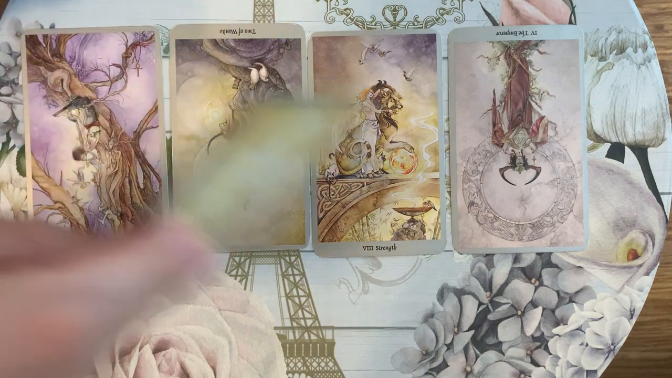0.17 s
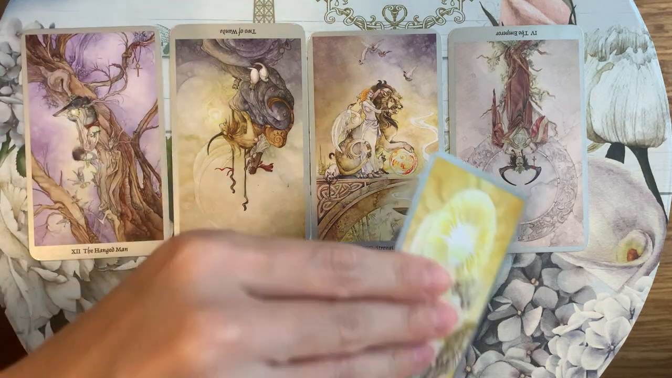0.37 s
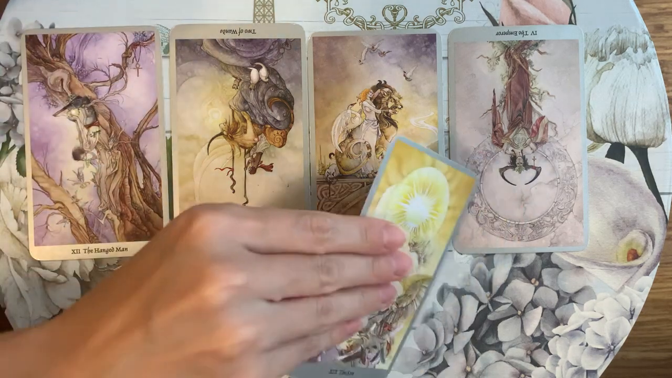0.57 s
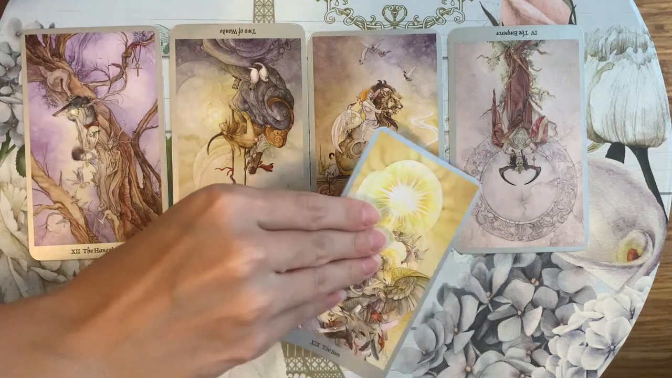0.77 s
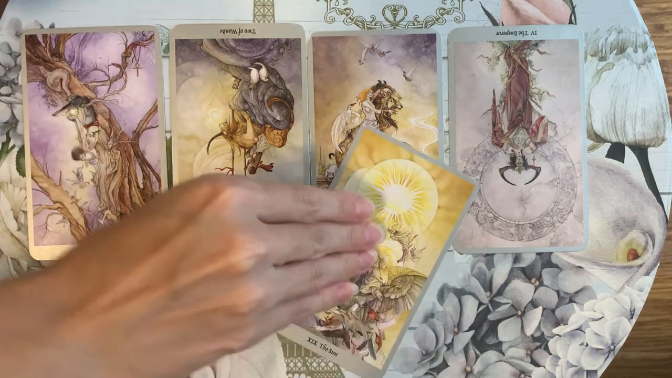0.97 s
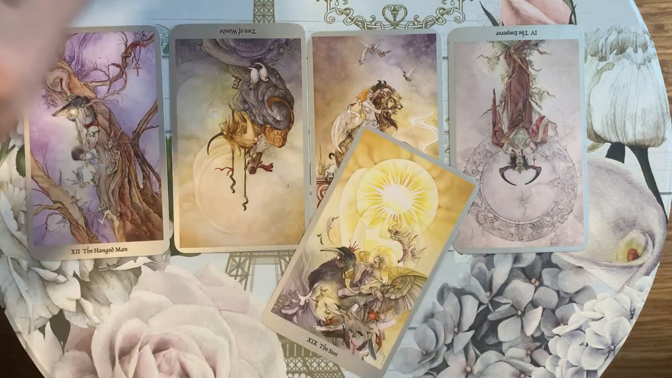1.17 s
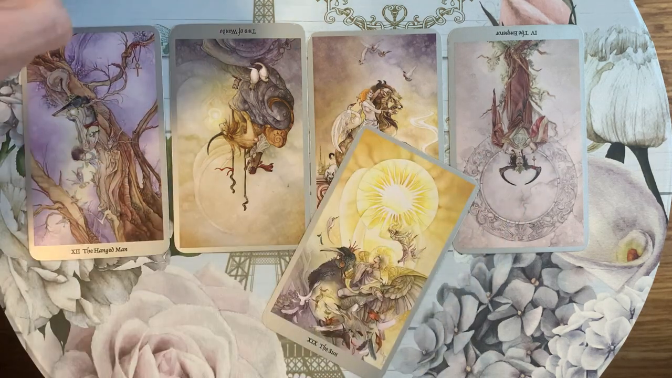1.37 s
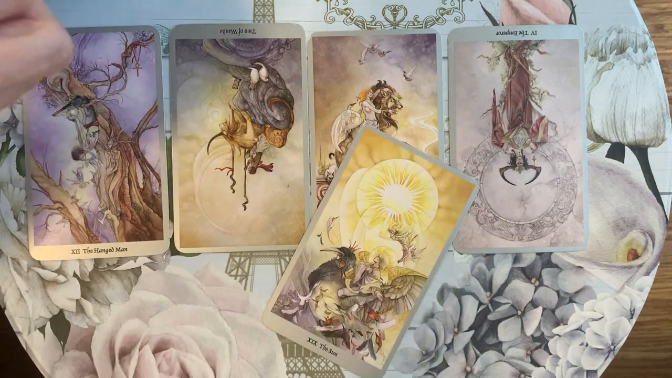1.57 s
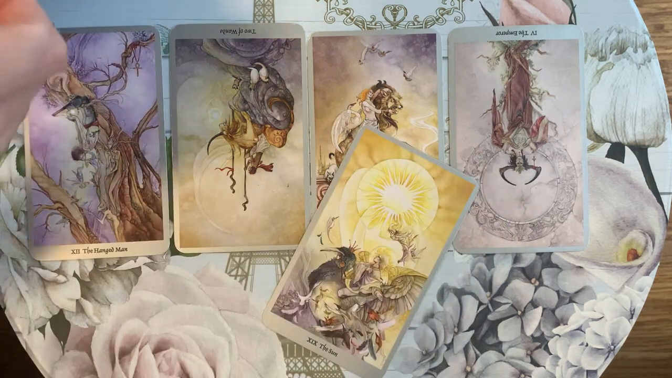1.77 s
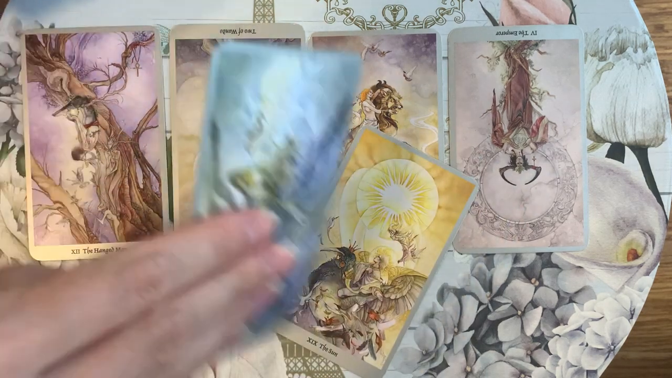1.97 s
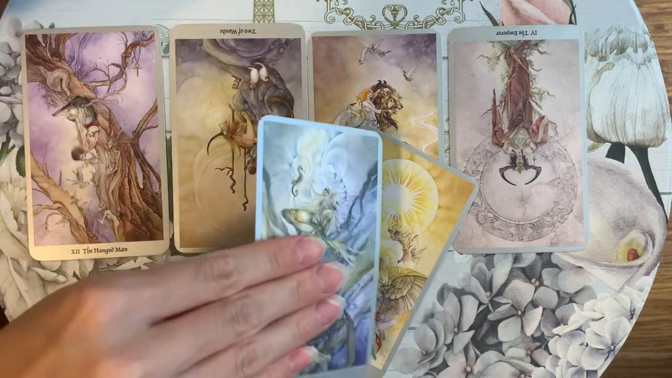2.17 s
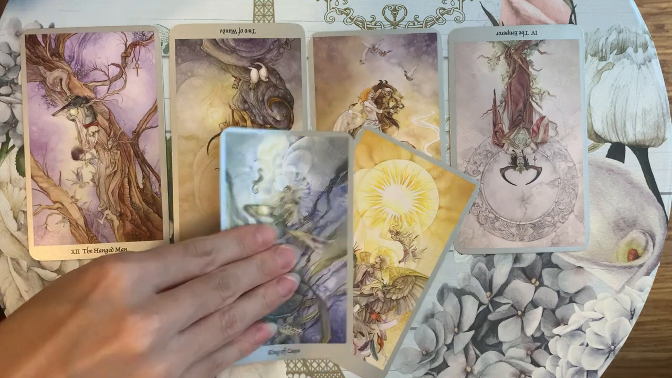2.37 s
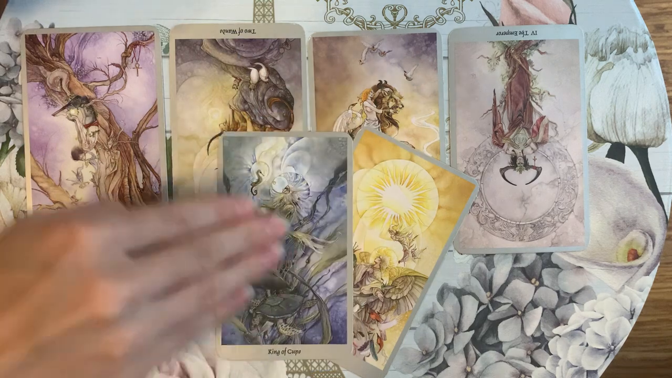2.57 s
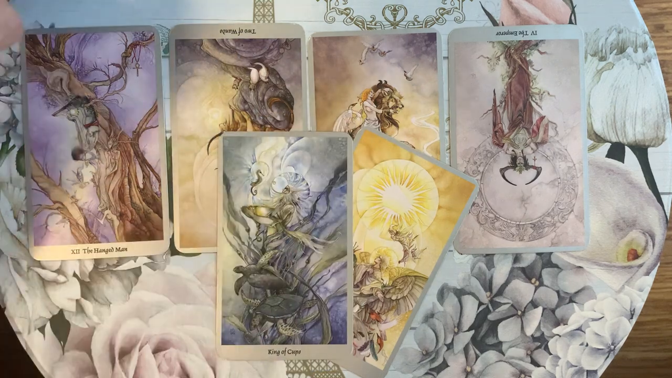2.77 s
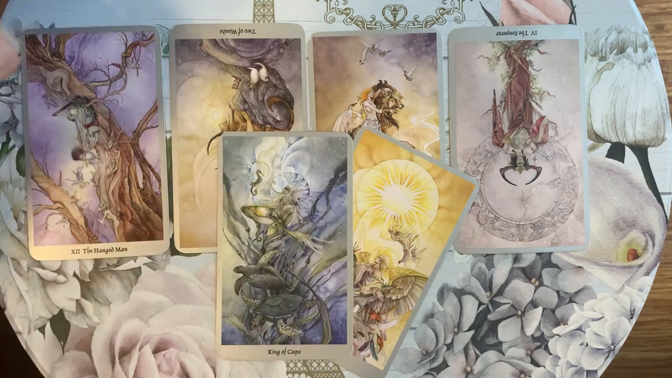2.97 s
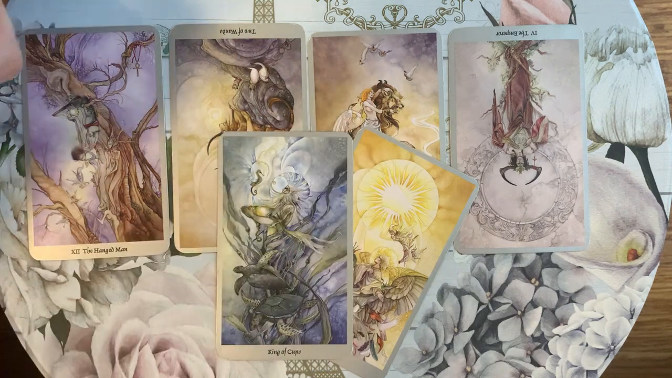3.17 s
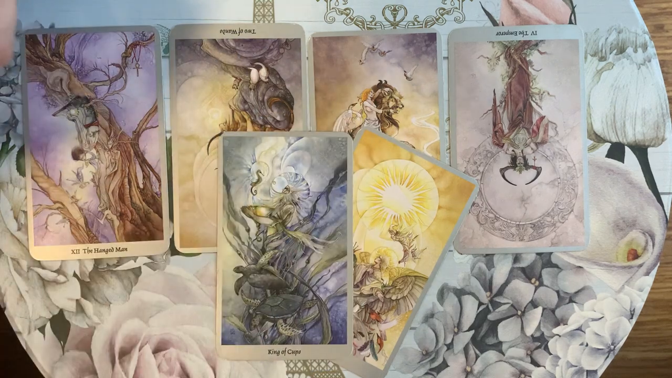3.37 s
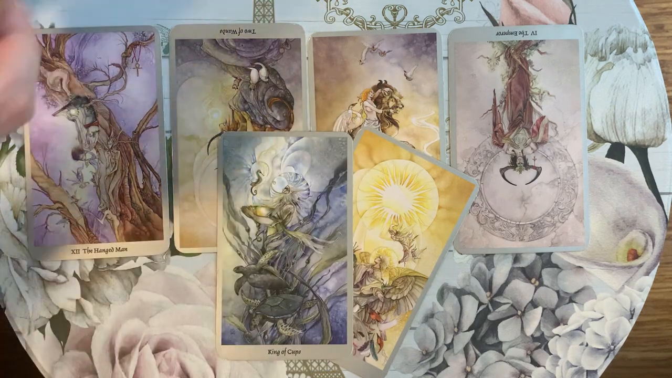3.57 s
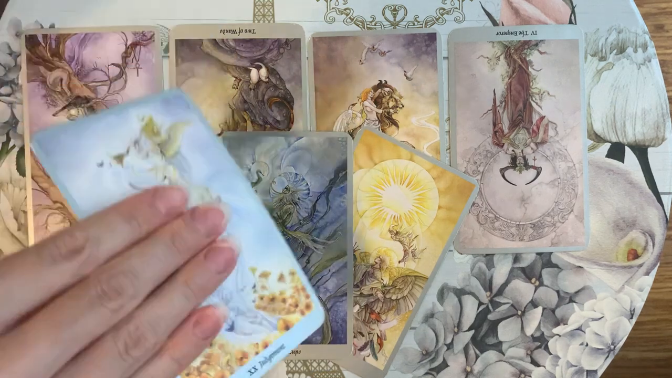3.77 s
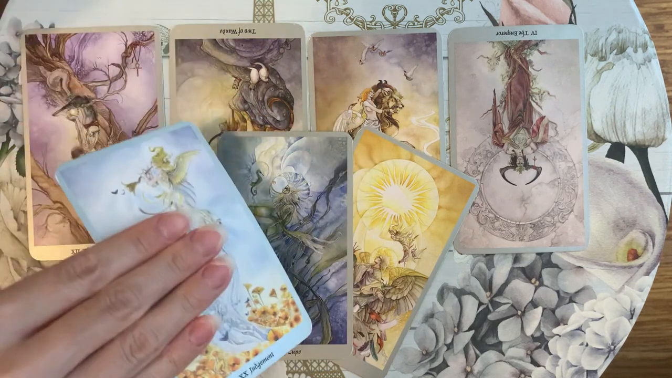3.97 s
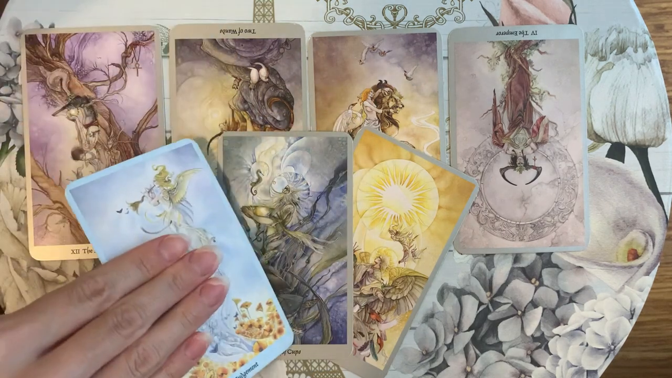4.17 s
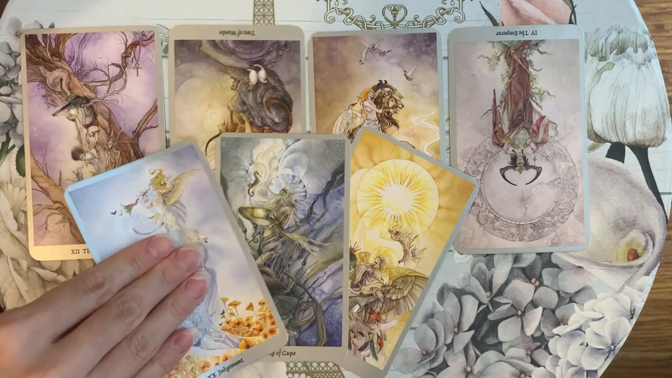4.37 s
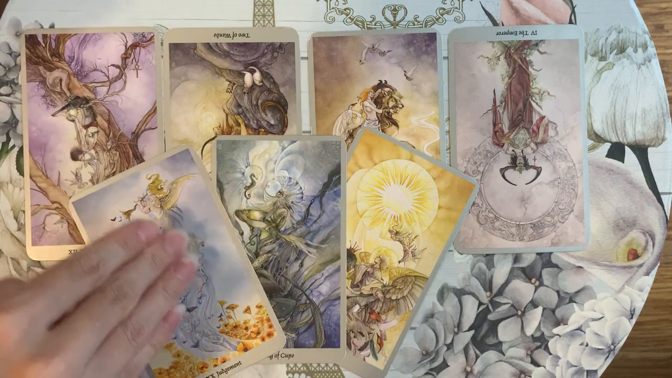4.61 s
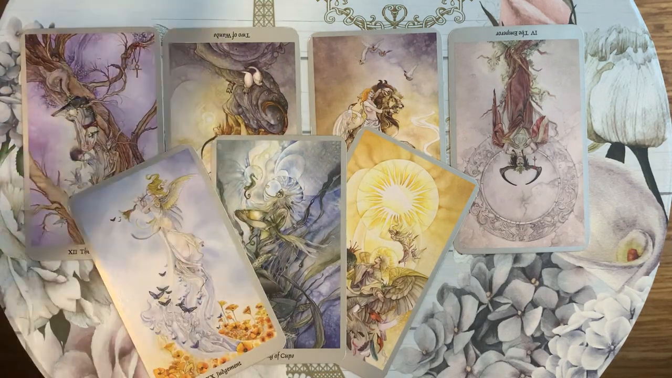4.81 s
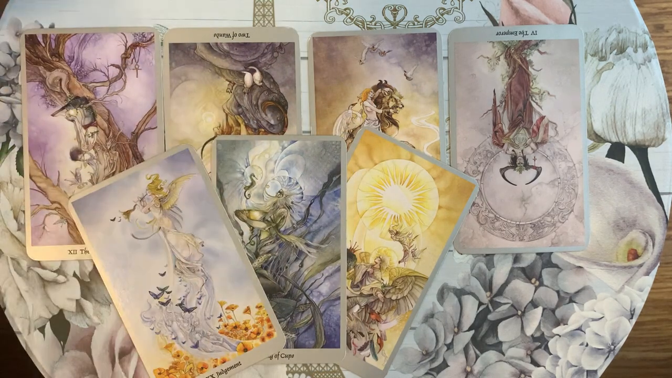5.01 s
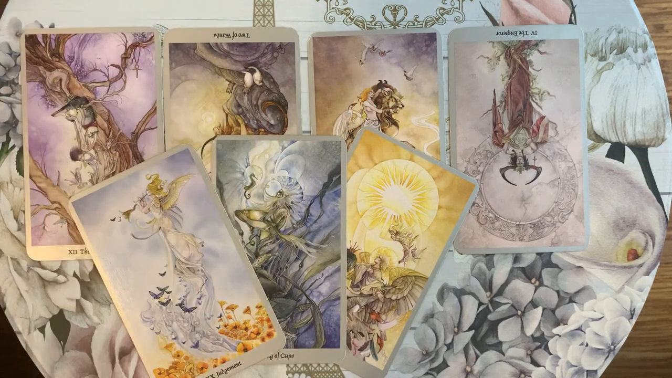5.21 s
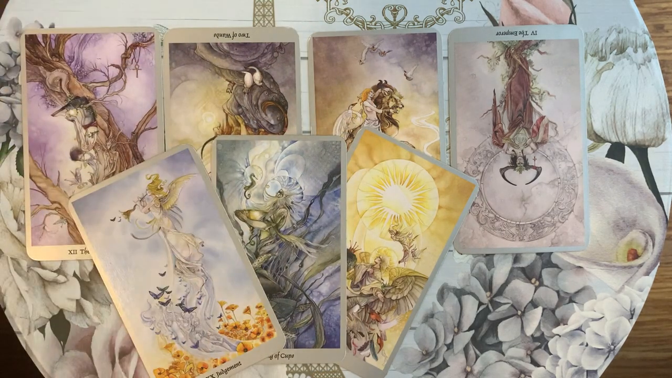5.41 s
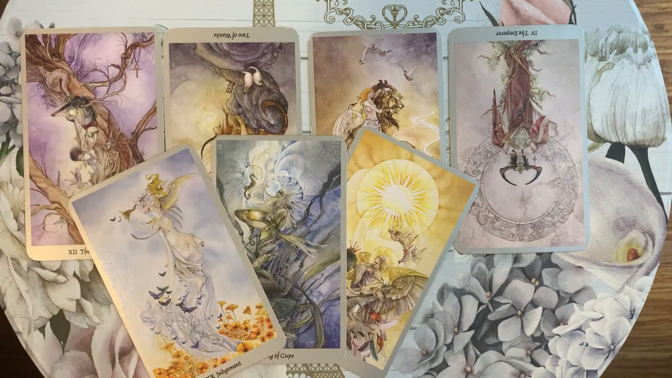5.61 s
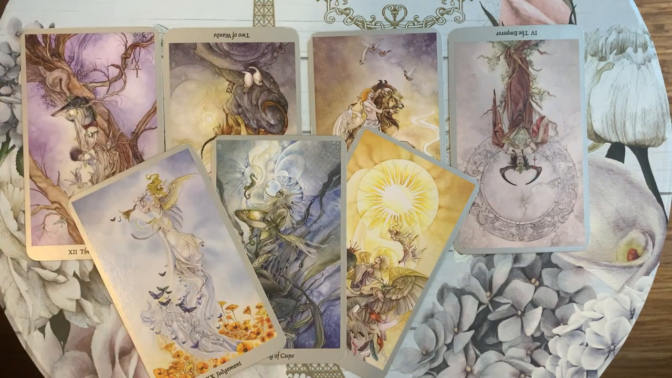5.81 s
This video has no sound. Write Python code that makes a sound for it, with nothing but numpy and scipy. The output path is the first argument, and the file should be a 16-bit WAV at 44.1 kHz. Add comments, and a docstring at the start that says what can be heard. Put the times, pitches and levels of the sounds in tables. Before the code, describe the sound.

Close stereo microphones at a small table in a quiet room. Three cards are drawn in turn from a deck held at the left: papery hiss and scrape, springy flick, edge tick, dull tabletop thud. Thumb scrapes fill the gaps; soft finger brushing and another card being worked loose end it.

```python
"""Close stereo microphones at a small table in a quiet room; a hand-held deck sits to the left.
Three tarot cards are drawn in turn: each slides off the deck (hiss and a ringing scrape of shaped noise),
flicks free (modes of the card), ticks down on its edge (noise bursts with one short ring),
and is pressed flat, which thumps the table top (modes of the table).
Last, a thumb starts to brush the next card loose. Low rumble and faint hiss lie behind it all."""
import sys
import numpy as np
from scipy import signal
from scipy.fft import rfft, irfft
from scipy.io import wavfile
from scipy.ndimage import uniform_filter1d

SR = 44100
rng = np.random.default_rng(int(sys.argv[2]) if len(sys.argv) > 2 else 0)


def wav_record(signal):
    """Record a signal, one row per channel, as 16-bit PCM in the file named by sys.argv[1]."""
    frames = np.transpose(np.atleast_2d(signal))
    bounded = np.clip(frames, -1, 1)
    # unit amplitude maps onto the largest positive 16-bit level
    quanta = np.round(bounded * 32767).astype(np.int16)
    wavfile.write(sys.argv[1], SR, quanta)


N = 257984
TIME = np.arange(N) / SR
HZ = np.fft.rfftfreq(N, 1 / SR)

# colour of the room's air: (frequency [Hz], relative level [dB])
AIR_COLOUR = [(12, -56), (25, -40.5), (38, -5.5), (52, 1), (70, -5), (104, -14.5), (193, -19), (290, -30.5),
              (434, -37), (923, -43), (2900, -49.5), (7000, -50.5), (8900, -48.5), (16000, -52)]
AIR_DB = -58.5  # rms
# decay of the room: (frequency [Hz], time to fall 60 dB [s])
ROOM_DECAY = [(100, 0.25), (300, 0.21), (1000, 0.23), (4000, 0.18), (9000, 0.18), (16000, 0.15)]
# likeness of the two channels: (frequency [Hz], correlation [-1..1])
CHANNEL_LIKENESS = [(60, 0.94), (200, 0.91), (400, 0.65), (700, 0.056), (1400, 0.013), (4000, 0.078),
                    (8000, 0.3), (15000, 0.72)]
# colour difference of the two microphones: (frequency [Hz], left minus right [dB])
MICROPHONE_LEAN = [(60, 0.5), (250, 0), (550, -2), (1200, -1), (4400, -1.2), (8300, 2), (13000, -0.7)]
BAND_EDGE_HZ = 16200

# a card shifted under the fingers grinds on the table: (time [s], rise [s], fall [s], level [dB])
TABLE_DRAGS = [(0.755, 0.073, 0.07, -55), (2.58, 0.066, 0.066, -60.5), (4.39, 0.044, 0.077, -65)]
# colour of that grinding: (frequency [Hz], relative level [dB])
GRIND_COLOUR = [(25, -45), (90, -2), (250, -4.5), (1000, -19), (1900, -27), (5000, -50)]

# fingers brushing a card or dragging it over those below:
# (time [s], rise [s], fall [s], skin hiss [dB], card rub [dB])
FINGER_BRUSHES = [(.245, 0.035, 0.064, -62.5, -86), (0.699, 0.042, 0.072, -86, -64),
                  (0.878, 0.027, 0.038, -68, -60.5), (1.037, 0.017, 0.022, -72, -52),
                  (1.205, 0.045, 0.054, -75, -99), (2.025, 0.029, 0.03, -62.5, -80),
                  (2.415, 0.016, 0.032, -76, -52), (2.486, .014, 0.012, -60, -68),
                  (2.525, 0.068, 0.0089, -60.5, -59.5), (2.75, 0.051, 0.08, -69.5, -96),
                  (4.295, 0.017, 0.044, -85, -70), (4.39, 0.034, 0.24, -91, -74.5),
                  (4.5, 0.019, 0.037, -62.5, -55.5), (4.538, 0.021, 0.017, -75, -53.5),
                  (5.183, 0.038, 0.043, -54.5, -65), (5.25, 0.039, 0.032, -61, -70.5),
                  (5.329, 0.028, 0.045, -50, -62), (5.45, 0.078, 0.047, -62, -84),
                  (5.509, 0.04, 0.024, -55.5, -68), (5.594, 0.025, 0.021, -47, -64.5)]
# colours of skin on card and of a card dragged flat: (frequency [Hz], relative level [dB])
SKIN_COLOUR = [(200, -28), (700, -39), (1500, -13.5), (3000, 0.5), (6500, 2.5), (8500, 8), (11000, 5.5),
               (14000, 4.5), (16000, -5)]
RUB_COLOUR = [(150, -3.5), (500, -12.5), (1100, -12.5), (1700, 2.5), (2200, -3.5), (3200, -3), (4600, -5),
              (6500, -9.5), (16000, -28.5)]

# a card pulled off the deck: (time it comes free [s], build-up [s], face hiss [dB], edge scrape [dB])
DECK_PULLS = [(0.152, 0.061, -64, -72), (1.959, 0.16, -52.5, -56), (3.677, 0.095, -50, -52.5)]
PULL_RING_HZ, HISS_FADE_S, SCRAPE_FADE_S, PULL_CURVE = 2530, 0.062, 0.033, 0.86
# the thumb works the top card loose in short pushes:
# (time [s], rise [s], fall [s], face hiss [dB], edge scrape [dB], resonance of the bent card [Hz])
THUMB_PUSHES = [(.075, 0.07, 0.086, -60.5, -65, 2475), (.106, 0.011, 0.049, -48.5, -53, 2220),
                (1.305, 0.013, 0.13, -64, -67.5, 3890), (1.385, 0.026, .04, -65.5, -60, 2406),
                (1.438, 0.038, 0.048, -62, -60.5, 2670), (1.512, .025, 0.031, -70, -61, 2450),
                (1.66, 0.022, 0.05, -61.5, -58, 2400), (1.704, 0.021, 0.014, -55.5, -50, 2900),
                (1.795, 0.013, 0.047, -63.5, -49, 2270), (2.931, 0.012, 0.1, -67, -67.5, 3480),
                (3.07, 0.063, 0.1, -72.5, -68, 3400), (3.207, 0.033, 0.053, -61, -61.5, 2860),
                (3.333, 0.018, 0.024, -70, -65.5, 3430), (3.419, 0.0043, 0.036, -73, -62, 2720),
                (3.49, 0.029, 0.095, -63.5, -69.5, 2770), (3.59, 0.053, 0.015, -51.5, -66.5, 2500),
                (3.665, 0.018, 0.039, -59, -42.5, 2493), (5.632, 0.026, 0.0302, -61, -67.5, 1840),
                (5.7, 0.027, 0.056, -65, -67, 2815), (5.728, .003, 0.016, -79, -50.5, 1680),
                (5.753, 0.006, 0.06, -83, -55, 1865), (5.825, 0.047, 0.087, -73.5, -63, 2150)]
RING_SAG_OCT_PER_S = 0.47  # the card unbends as it slides, so its resonance sinks
# colours of card face on card face and of a scraping edge: (frequency [Hz], relative level [dB])
FACE_COLOUR = [(200, -18.5), (700, -23), (1500, -3.5), (3500, -6.5), (5200, -6), (7000, -4.5), (8900, 4),
               (11000, -5.5), (13500, -2.5), (16000, -16.5)]
SCRAPE_COLOUR = [(150, -14.5), (550, -12.5), (880, 0), (1150, -11), (2000, -1.5), (3800, 3), (5000, -6.5),
                 (8000, -18), (16000, -47)]
FACE_DAMPING = 0.78  # share of scrape power that stays broad when the faces are in full contact

# a stroke has a rounded top and is this far down after its rise or fall time
STROKE_CURVE, STROKE_EDGE_DB = 1.59, -10
# stick and slip: mean rate, decay of a jerk, its least size over the steady scrape, scale of the excess
SLIPS_PER_S, SLIP_S, SLIP_DB, SLIP_SPREAD_DB = 130, .0006, 5, 2.5

# a card springing straight:
# (time [s], peak [dB], centre of the push [Hz], its width [octaves], left minus right [dB])
CARD_FLICKS = [(.153, -55.5, 600, 1, 19), (.26, -53, 420, 0.87, 6), (.658, -36.5, 1080, 0.42, -1),
               (1.041, -44, 3980, 0.27, 1), (1.717, -46, 950, .6, 10), (1.955, -46, 714, 0.25, 14),
               (1.961, -30.5, 920, 0.19, 3), (1.9655, -26.5, 593, 0.32, 3), (2.358, -46.5, 700, 1, 4),
               (3.188, -64, 710, 1, 5), (3.557, -41.5, 936, 0.19, 8), (3.679, -24, 1540, 0.6, 2.5),
               (3.682, -30.5, 564, 0.45, 6.5), (3.695, -35, 460, 1, -6), (4.549, -42, 435, 0.36, -5),
               (4.551, -39.5, 1660, 0.62, -2)]
# modes of a card: (frequency [Hz], relative level [dB], time to fall 60 dB [s])
CARD_MODES = [(486, 5.5, 0.037), (570, -1.5, 0.0145), (714, 13, 0.01), (721, -3.5, 0.11), (904, -9, 0.035),
              (1061, -12, 0.11), (1267, -8.5, 0.034), (1361, -3, 0.054), (1426, -10.5, 0.086),
              (1530, -16.5, 0.095), (1816, -19, 0.13), (2500, -8, 0.054), (3370, -9, 0.093),
              (5020, -10, 0.19)]
# edges catching, dragging and landing:
# (time [s], level [dB], swell [s], decay [s], tilt [dB per octave], ring [Hz], ring level [dB])
EDGE_TICKS = [(.1035, -41, .0005, 0.0055, 15, 2460, -12), (.153, -35.5, 0.00099, 0.0018, 1, 2460, -16),
              (.26, -41, 0.00099, 0.002, 10.5, 2420, 3), (0.6582, -35, 0.001, 0.0025, -3.5, 1650, -3),
              (1.0412, -33.5, 0.0028, 0.0015, 0.5, 4850, 10.5),
              (1.276, -40, 0.0007, 0.00091, -1.5, 7900, 2), (1.278, -42.5, 0.00089, 0.0046, -1, 3880, 5),
              (1.3551, -42, 0.00039, 0.002, -0.5, 2080, 18), (1.437, -40, 0.0025, 0.0025, -1.5, 2700, 23.5),
              (1.598, -52, 0.00098, 0.0048, -1, 3320, 13), (1.7017, -41.5, 0.00059, .001, -8, 2390, 15),
              (1.7072, -38.5, 0.00067, 0.00087, -5.5, 3330, 22),
              (1.7167, -27.5, 0.00036, 0.0016, -0.5, 2700, 14.5),
              (1.94, -38.5, 0.001, 0.0076, -2.5, 2460, 21), (1.955, -32, 0.0014, 0.0018, 1.5, 860, 17),
              (1.962, -30, 0.001, 0.0036, -3, 920, -8), (2.358, -46, 0.00047, 0.0045, -7.5, 3900, 23),
              (2.3863, -30.5, 0.00092, 0.0031, -0.5, 4140, 11.5),
              (2.388, -38.5, 0.0011, 0.0028, -0.5, 1750, 28),
              (2.489, -45.5, 0.0077, 0.00091, -3, 4000, -22), (2.5349, -38.5, 0.0049, 0.0013, 0.5, 1350, 3),
              (2.628, -63.5, 0.0086, 0.0045, 2, 6300, 24), (2.864, -42, 0.00061, 0.001, -1, 3630, 3),
              (2.868, -42, 0.00031, 0.0096, -1, 3440, 18.5), (3.160, -43, 0.00035, 0.00068, 3.5, 8900, -22),
              (3.189, -39, 0.00078, 0.0014, -3.5, 2090, 10), (3.475, -48, 0.0024, 0.0027, 0, 2840, 28),
              (3.5575, -34.5, 0.00084, 0.0034, -2, 2480, 24), (3.6792, -29.5, 0.0019, 0.0026, -2, 2430, 3),
              (4.266, -40.5, 0.00032, 0.0015, -1, 3260, 4), (4.552, -37.5, 0.0053, 0.0008, -3, 4480, 17.5),
              (5.6717, -27.5, 0.00034, 0.00054, 2, 5520, 14.5),
              (5.726, -48.5, 0.00056, 0.0022, -3.5, 1650, 12), (5.752, -51, .0005, 0.0013, -5, 1900, 12)]
# colour of an edge's tick: (frequency [Hz], relative level [dB])
TICK_COLOUR = [(30, -20), (300, -7.5), (800, -3), (1800, -4.5), (4000, -5.5), (6000, -5.5), (8500, -1.5),
               (12000, -5), (16000, -10.5)]
# card and fingers meeting the table: (time [s], peak [dB], centre of the push [Hz], its width [octaves])
TABLE_THUMPS = [(.658, -40, 436, .3), (.663, -32.5, 129, 0.45), (.742, -45, 248, 0.19),
                (.775, -44, 137, 0.24), (1.038, -32.5, 342, 0.88), (1.0435, -16.5, 149, 0.62),
                (1.276, -48, 252, 0.52), (1.963, -39.5, 142, 0.9), (2.368, -31, 109, 0.17),
                (2.387, -35.5, 393, 1.6), (2.39, -24.5, 122.5, 0.25), (2.413, -25.5, 124, 0.77),
                (2.445, -33.5, 122, 0.27), (2.485, -27, 125, 0.71), (2.53, -24, 196, 1.02),
                (2.578, -33, 132, 0.68), (2.638, -40.5, 121, 0.58), (2.862, -43.5, 325, 0.2),
                (3.686, -33.5, 180, 0.88), (4.274, -42, 101, 1.3), (4.368, -32, 150, 0.97),
                (4.511, -36, 114, 1.1), (4.549, -26, 230, 0.91), (4.668, -43, 107, 0.52),
                (5.726, -50.5, 189.4, 0.77)]
# modes of the table top: (frequency [Hz], relative level [dB], time to fall 60 dB [s])
TABLE_MODES = [(72.2, -13.5, 0.47), (100.1, -12, 0.041), (116, 2.5, 0.088), (156.6, -2, 0.042),
               (214.2, -18.5, 0.22), (251.6, -7, 0.12), (336, -15.5, 0.059), (381.6, -7.5, 0.049),
               (422.4, -17, 0.083), (572, -16.5, 0.09)]


def amp(db):
    """Decibels to gain."""
    return 10 ** (np.asarray(db) / 20)


def unit(x):
    """Scales to an rms of one."""
    return x / np.sqrt(np.mean(x ** 2) + 1e-20)


def read(points, hz):
    """Reads a spectrum on a log-frequency axis."""
    f, value = np.transpose(points)
    return np.interp(np.log(hz + 1), np.log(f), value)


def add(mix, s, sound):
    """Mixes a sound in at a time, dropping what falls outside."""
    start = round(s * SR)
    sound = sound[..., max(-start, 0):]
    part = mix[:, max(start, 0):][:, :sound.shape[-1]]
    part += sound[..., :part.shape[-1]]


def placed(x, pan_db):
    """Makes the left channel louder than the right by pan_db."""
    return x * amp(np.array([[.5], [-.5]]) * pan_db)


def pair(x, gain, hz, direct=0):
    """Colours two unrelated noises and makes them as alike as two close microphones hear them."""
    left, other = rfft(x)
    same = np.clip(read(CHANNEL_LIKENESS, hz) + direct, -.98, .98)
    right = same * left + np.sqrt(1 - same ** 2) * other
    return irfft(np.array([left, right]) * gain, x.shape[-1])


def wander(rate_hz):
    """Smooth chance of rms one."""
    noise = rfft(rng.standard_normal(N))
    return unit(irfft(noise * np.exp(-(HZ / rate_hz) ** 2), N))


def air():
    """The low rumble and faint hiss of a quiet room, as shaped noise."""
    noise = rng.standard_normal((2, N))
    return amp(AIR_DB) * unit(pair(noise, amp(read(AIR_COLOUR, HZ)), HZ))


def room(x, size=32768):
    """Dense reflections from the room, each band dying at its own speed."""
    present = rng.random((2, size)) < .12
    after_gap = np.arange(size) / SR > .004
    taps = rng.standard_normal((2, size)) * present * after_gap
    reflections = pair(taps, 1, np.fft.rfftfreq(size, 1 / SR))
    hz, t, z = signal.stft(reflections, SR, nperseg=256)
    decay = amp(-60 * t / read(ROOM_DECAY, hz)[:, None])
    tail = signal.istft(z * decay, SR, nperseg=256)[1]
    return signal.fftconvolve(x, tail / np.linalg.norm(tail[0]), axes=1)[:, :N]


def nearby(x, count=7):
    """Table, hands and deck throw back a few quick reflections, different at each microphone."""
    out = np.zeros((2, N))
    for channel in np.eye(2):
        for delay in np.linspace(.0008, .011, count) + .0012 * rng.random(count):
            gain = rng.choice([-1, 1]) * amp(-600 * delay)  # later ones are weaker
            add(out, delay, channel[:, None] * x * gain)
    return out


def stroke(s, rise, fall, curve):
    """Gain of one movement of the hand: it speeds up until s, then slows."""
    away = np.maximum((s - TIME) / max(rise, .002), (TIME - s) / max(fall, .002))
    near = away < 8
    gain = np.zeros(N)
    gain[near] = amp(STROKE_EDGE_DB * away[near] ** curve)
    return gain


def friction(colour, grain_db, flutter_db, patchy_db, size=512):
    """Paper fibres catch and let go: fine grains, uneven pressure, colour shifting with the gap."""
    grip = amp(grain_db * wander(1100) + flutter_db * wander(56))
    noise = pair(rng.standard_normal((2, N)) * grip, amp(read(colour, HZ)), HZ)
    z = signal.stft(noise, nperseg=size)[2]
    # patches of level, smoothed over frequency and then time
    patches = rng.standard_normal(z.shape[1:])
    for _ in range(2):
        patches = uniform_filter1d(patches, size=6, axis=0)
        patches = uniform_filter1d(patches, size=13, axis=1)
    patched = signal.istft(z * amp(patchy_db * unit(patches)), nperseg=size)[1]
    return unit(patched[:, :N])


def slips():
    """Gain of stick and slip: the edge catches at random and lets go with tiny jerks, a few large."""
    excess = np.minimum(rng.exponential(1, N), np.pi)
    strength = amp(SLIP_DB + SLIP_SPREAD_DB * excess)
    jerks = strength * (rng.random(N) < SLIPS_PER_S / SR)
    decaying = signal.lfilter([1], [1, -np.exp(-1 / (SLIP_S * SR))], jerks)
    return np.hypot(1, decaying)


def drags():
    """Coarse, uneven rubbing that the table top makes low and hollow."""
    pressure = sum(amp(db) * stroke(s, rise, fall, STROKE_CURVE) for s, rise, fall, db in TABLE_DRAGS)
    return pressure * friction(GRIND_COLOUR, grain_db=2.0, flutter_db=0.5, patchy_db=4.5)


def brushes():
    """Skin hisses softly over a card and drags it against the ones below."""
    hiss = friction(SKIN_COLOUR, grain_db=1.1, flutter_db=2.0, patchy_db=1.5)
    rub = friction(RUB_COLOUR, grain_db=1.5, flutter_db=3.5, patchy_db=3.5)
    rub = unit(np.sqrt(slips()) * rub)
    hiss_power, rub_power = np.zeros(N), np.zeros(N)
    for s, rise, fall, hiss_db, rub_db in FINGER_BRUSHES:
        speed = stroke(s, rise, fall, STROKE_CURVE)
        hiss_power += (amp(hiss_db) * speed) ** 2
        rub_power += (amp(rub_db) * speed) ** 2
    return np.sqrt(hiss_power) * hiss + np.sqrt(rub_power) * rub


def resonate(x, hz, width):
    """A resonance, width in Hz, that follows the curve hz."""
    turn = np.exp(2j * np.pi * np.cumsum(hz) / SR)
    r = np.exp(-np.pi * width / SR)
    return 2 * (turn * signal.lfilter([1 - r], [1, -r], x / turn)).real


def slides():
    """The faces hiss; the edge scrapes and rings two modes of the card, whose pitch moves with the grip."""
    hiss_power, scrape_power = np.zeros(N), np.full(N, 1e-14)
    for s, build, hiss_db, scrape_db in DECK_PULLS:
        hiss_power += (amp(hiss_db) * stroke(s, build, HISS_FADE_S, PULL_CURVE)) ** 2
        scrape_power += (amp(scrape_db) * stroke(s, build, SCRAPE_FADE_S, PULL_CURVE)) ** 2
    bend = scrape_power * PULL_RING_HZ
    for s, rise, fall, hiss_db, scrape_db, hz in THUMB_PUSHES:
        speed = stroke(s, rise, fall, STROKE_CURVE)
        power = (amp(scrape_db) * speed) ** 2
        hiss_power += (amp(hiss_db) * speed) ** 2
        scrape_power += power
        bend += power * hz * np.exp2(RING_SAG_OCT_PER_S * (s - TIME))
    # the strongest movement dominates the bend, and the fingers never hold it quite still
    ring_hz = bend / scrape_power * np.exp(.03 * wander(40))

    catch = slips()
    hiss = friction(FACE_COLOUR, grain_db=2.5, flutter_db=1.5, patchy_db=4.0)
    hiss = unit(np.sqrt(catch) * hiss)
    scrape = friction(SCRAPE_COLOUR, grain_db=2.5, flutter_db=3.0, patchy_db=2.5)
    scrape = unit(catch * scrape)
    first = resonate(resonate(scrape, ring_hz, width=450), ring_hz, width=1000)
    second_hz = 1.42 * ring_hz
    second = resonate(resonate(scrape, second_hz, width=450), second_hz, width=1000)
    ring = unit(first + amp(-14) * second)

    # the edge alone rings cleanly; faces that press together damp the ring and leave a broad scrape
    contact = np.sqrt(hiss_power / (hiss_power + scrape_power))
    damped = FACE_DAMPING * contact
    edge = np.sqrt(1 - damped) * ring + np.sqrt(damped) * scrape
    return np.sqrt(hiss_power) * hiss + np.sqrt(scrape_power) * edge


def blows(rows, modes, lag, spread, size=32768):
    """A soft push wakes modes near its centre; bending waves carry high ones first, so the pitch falls."""
    out, t = np.zeros((2, N)), np.arange(size) / SR
    hz = np.fft.rfftfreq(size, 1 / SR) + 1
    # neighbouring modes radiate from opposite ends, the higher ones more so; spread is in radians
    sides = np.array([[1], [-1]]) * spread / modes[-1][0]
    ringing = np.zeros((2, size))
    for k, (f, db, t60) in enumerate(modes):
        phase = (-1) ** k * f * sides
        ringing += amp(db - 60 * t / t60) * np.sin(2 * np.pi * f * t + phase)
    # the response falls away far below the lowest mode, under about a fifth of its frequency
    body = rfft(ringing) / (1 + (0.18 * modes[0][0] / hz) ** 4)
    lead = size // 16 / SR
    # the delay is lag seconds at 100 Hz and goes as one over the root of the frequency
    travel = np.exp(-2j * np.pi * (2 * lag * np.sqrt(100 * hz) + lead * hz))
    for s, db, centre_hz, octaves, *pan_db in rows:
        push = np.exp(-.5 * (np.log2(hz / centre_hz) / octaves) ** 2)
        wave = irfft(body * travel * push, size)
        add(out, s - lead, amp(db) * placed(wave / abs(wave).max(), sum(pan_db)))
    return out


def flicks():
    """Cards spring straight and ring their own modes, spread wide across the microphones."""
    return blows(CARD_FLICKS, CARD_MODES, lag=0.00423, spread=1.0)


def ticks(size=16384):
    """An edge ticks: a noise burst with a soft, weak skirt before and after, and one short ring."""
    out, hz = np.zeros((2, N)), np.fft.rfftfreq(size, 1 / SR)
    t = (np.arange(size) - size // 2) / SR
    skirt = amp(-23.0) * np.exp(-abs(t) / 0.008)
    for s, db, swell, decay, tilt_db, ring_hz, ring_db in EDGE_TICKS:
        snap = np.exp(np.where(t < 0, t / max(swell, 1e-4), -t / max(decay, 1e-4)))
        shape = np.hypot(snap, skirt)
        ring = 1 + amp(ring_db) / (1 + 1j * (hz - ring_hz) / 220)
        tilt = tilt_db * np.log2(np.maximum(hz, 300) / 3000)
        colour = amp(read(TICK_COLOUR, hz) + tilt) * ring
        burst = pair(rng.standard_normal((2, size)) * shape, colour, hz, direct=0.062)
        add(out, s + t[0], amp(db) * unit(burst) * np.sqrt(np.mean(shape ** 2)))
    return out


def thumps():
    """Card and fingers push the table top, whose low modes answer with a short thud."""
    return blows(TABLE_THUMPS, TABLE_MODES, lag=0.01265, spread=0.32)


def scene():
    """Cards and table, close by, with the room behind them; the deck is held to the left."""
    rub = drags() + placed(brushes(), pan_db=1.3) + placed(slides(), pan_db=1.0)
    flick, tick, thump = flicks(), ticks(), thumps()
    early = amp(-14.0) * nearby(rub + tick)
    echo = room(amp(-15.0) * rub + amp(-11.5) * tick + amp(-11.0) * thump + amp(-11) * flick)
    return air() + echo + early + rub + flick + tick + thump


def record(dry):
    """The two microphones differ a little in colour; then a low-pass limits the band."""
    lean = placed(1, read(MICROPHONE_LEAN, HZ))
    heard = irfft(rfft(dry) * lean, N)
    low_pass = signal.firwin(511, BAND_EDGE_HZ, window=("kaiser", 9), fs=SR)
    return signal.oaconvolve(heard, low_pass[None], "same", axes=1)


dry = scene()
out = record(dry)
wav_record(out)
```